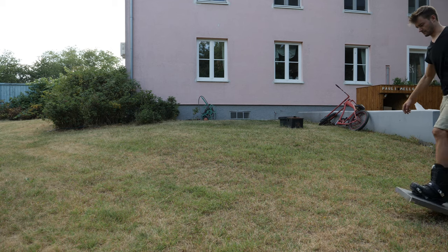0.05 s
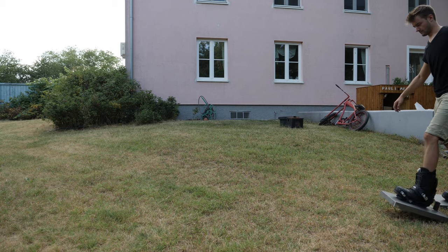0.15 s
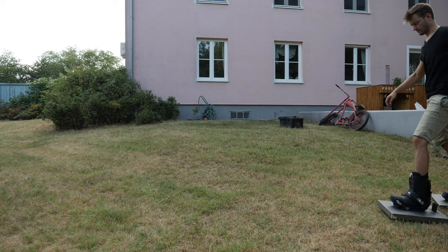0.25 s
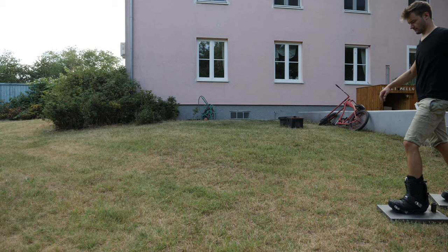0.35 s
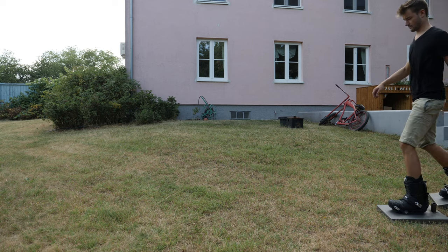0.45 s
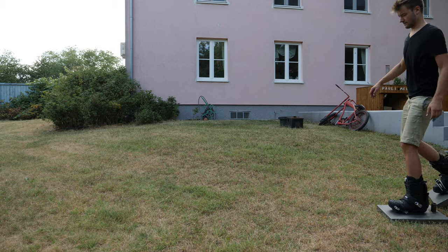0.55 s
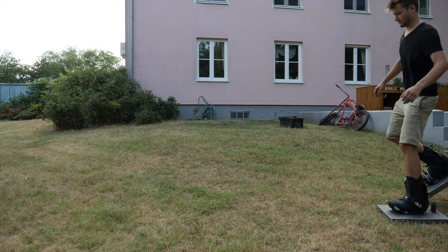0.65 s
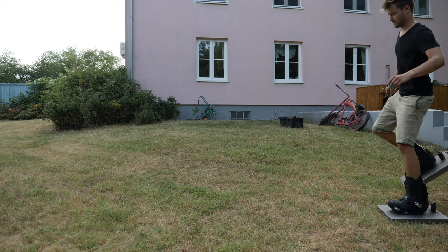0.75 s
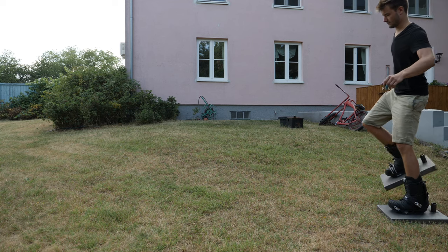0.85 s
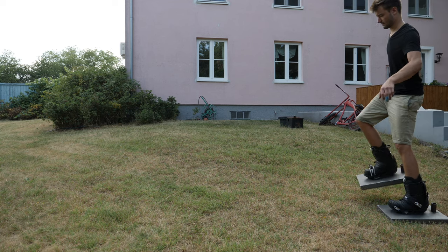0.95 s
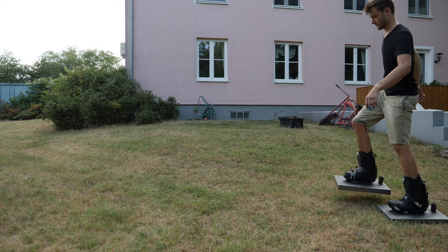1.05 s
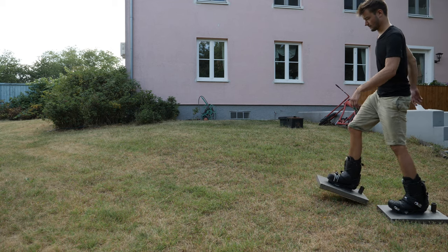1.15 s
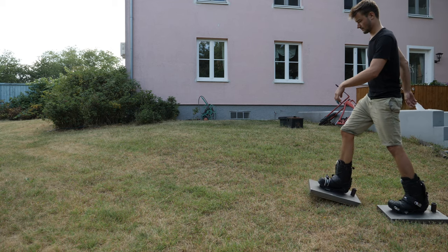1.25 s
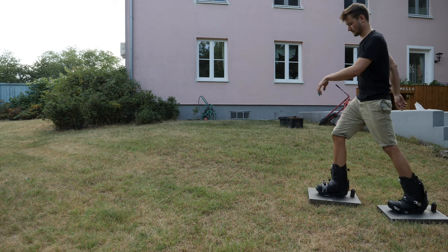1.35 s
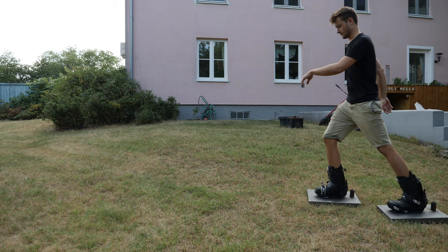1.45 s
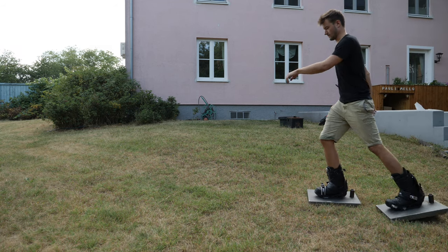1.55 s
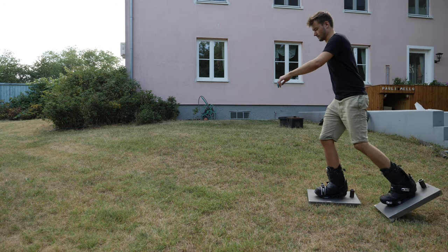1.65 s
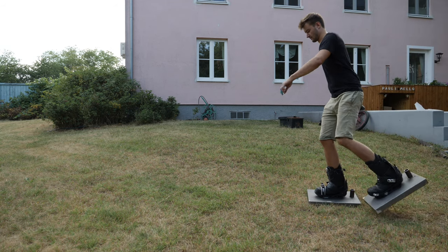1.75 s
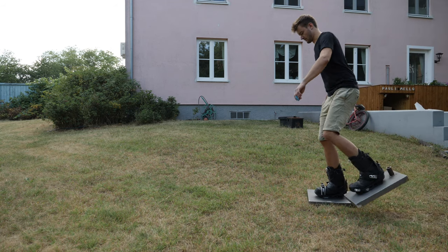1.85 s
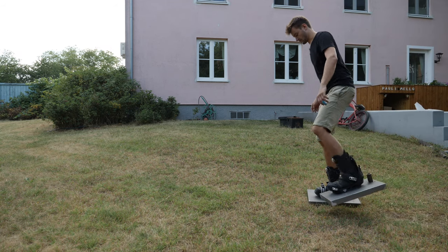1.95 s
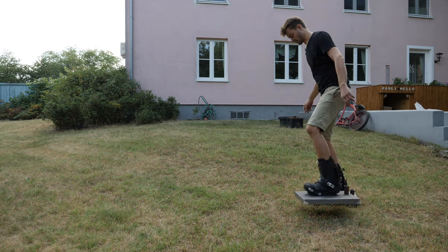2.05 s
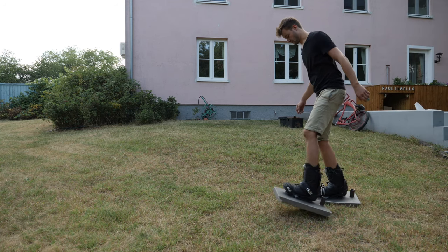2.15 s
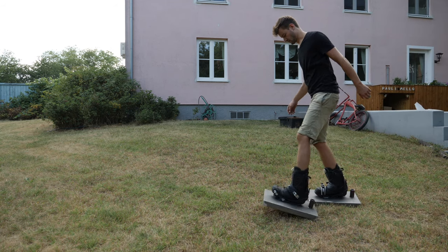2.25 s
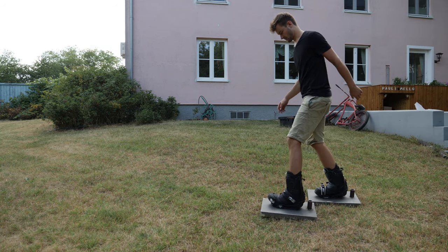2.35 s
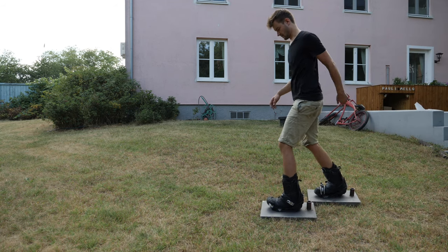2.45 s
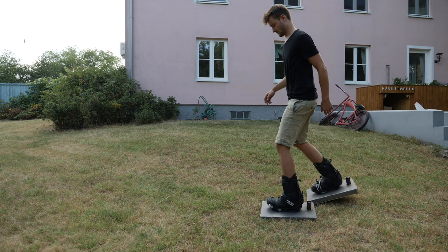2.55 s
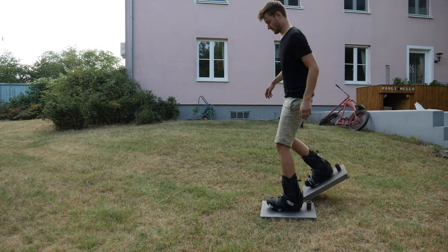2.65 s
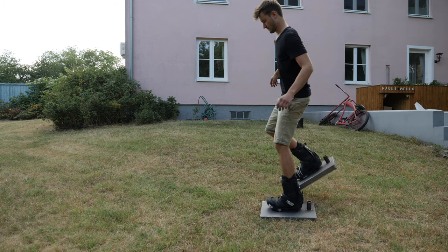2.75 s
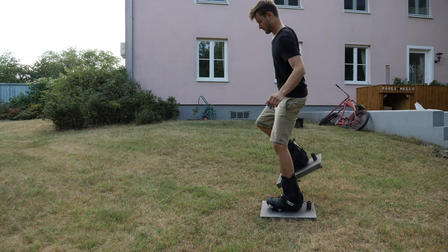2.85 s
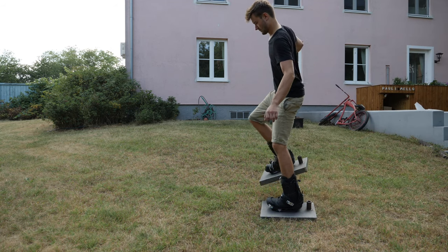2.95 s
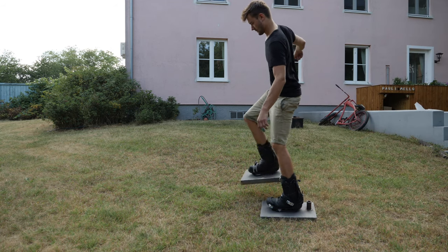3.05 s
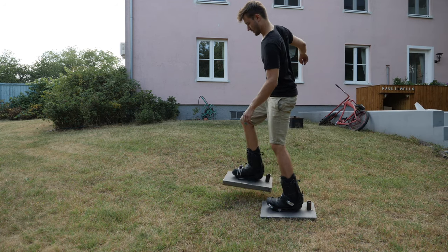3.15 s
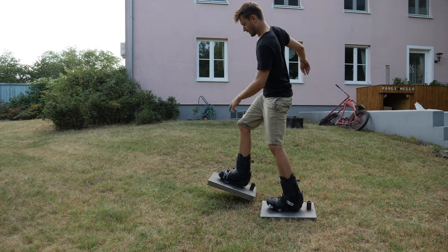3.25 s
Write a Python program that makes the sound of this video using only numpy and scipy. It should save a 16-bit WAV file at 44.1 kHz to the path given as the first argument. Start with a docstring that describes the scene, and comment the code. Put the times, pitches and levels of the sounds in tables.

```python
"""On a dry lawn, someone takes three slow steps in stiff plastic boots fixed to heavy plates.
Each plate swishes through the grass and lands with a clack. As the weight rolls over it, the
ground thuds, the grass crunches and the boot shell creaks and snaps; a lifted boot ticks.
Light wind rumbles on the microphone throughout."""
import sys
import numpy as np
from scipy import signal
from scipy.fft import rfft, irfft
from scipy.io import wavfile
from scipy.ndimage import uniform_filter1d

SR = 44100
rng = np.random.default_rng(int(sys.argv[2]) if len(sys.argv) > 2 else 0)


def dump(signal):
    """Clip the signal to [-1, 1] and save it as 16-bit WAV at the path in sys.argv[1]."""
    limited = np.clip(np.atleast_2d(signal).T, -1, 1)
    pcm = np.round(limited * 32767).astype(np.int16)
    wavfile.write(sys.argv[1], SR, pcm)


N = 145530
TIME = np.arange(N) / SR
RING_TIME = TIME[:SR // 4]

# Gusts of wind: t/s, level/dB
GUSTS = [(0.0, -40.5), (0.11, -46.5), (0.34, -36), (0.47, -43), (0.55, -37.5), (0.85, -30), (1.28, -40),
         (1.45, -29), (1.51, -35), (1.62, -18.5), (1.79, -34.5), (1.98, -30), (2.09, -24), (2.47, -32),
         (2.96, -26.5), (2.99, -22.5), (3.19, -47.5), (3.3, -36)]
# Snaps of the shell or a buckle: t/s, level/dB, ring f/Hz
SHELL_SNAPS = [(0.051, -54, 1360), (0.12, -54.5, 1320), (0.536, -41.5, 3100), (0.553, -41, 3000),
               (0.6197, -31.5, 1700), (0.625, -41, 1470), (0.85, -50.5, 2900), (1.3003, -30.5, 1080),
               (1.366, -42, 1530), (1.535, -37.5, 3250), (1.7141, -32.5, 2530), (1.924, -57, 3760),
               (1.935, -52, 1090), (2.005, -56, 3780), (2.128, -47.5, 1200), (2.1712, -49.5, 6230),
               (2.672, -37.5, 3950), (2.685, -30, 1580), (3.155, -42.5, 1640), (3.173, -44, 1510)]
# Grass brushing a plate: peak t/s, level/dB, 20 dB rise/s, 20 dB fall/s
GRASS_SWISHES = [(0.178, -48, 0.021, .05), (0.212, -41, .035, 0.076), (0.378, -46, 0.05, .04),
                 (0.416, -41.5, 0.023, 0.013), (0.48, -56.5, 0.04, 0.14), (1.295, -47, 0.059, 0.062),
                 (1.468, -44, .012, .04), (1.488, -43, .02, 0.036), (1.771, -54, 0.1, 0.088),
                 (2.307, -39.5, 0.055, .08), (2.448, -49, 0.028, 0.058), (2.505, -43, 0.076, 0.019),
                 (2.561, -45.5, .02, 0.054)]
# A plate knocking on its boot: t/s, level/dB, treble cutoff f/Hz, ring level/dB
PLATE_HITS = [(0.217, -25, 1170, -8), (0.2258, -17.5, 11000, -0.5), (1.2995, -26.5, 1580, -3),
              (2.3045, -21, 2380, -2), (2.3112, -21.5, 9000, -12), (2.3146, -21, 3180, 3)]
# The notes boot and plate ring with: f/Hz, level/dB, 60 dB fade/s
PLATE_NOTES = [(452, -12, 0.092), (584, -12.5, 0.075), (672.5, -12.5, 0.17), (814, -9.5, 0.2),
               (1140, -4, 0.05), (1275, -10, 0.13), (1545, -15.5, 0.18), (1773, -15.5, 0.17),
               (1963, -14, 0.1), (2110, -19, 0.2), (2420, -21.5, 0.13), (3522, -28.5, 0.11),
               (4230, -29, 0.085), (4255, -17, 0.13)]
# Grass crunching underfoot, one list a step: t/s, level/dB
STEP_CRUNCHES = [
    [(0.25, -70), (0.28, -43), (0.33, -51), (0.41, -45.5), (0.46, -47.5), (0.52, -53), (0.58, -57),
     (0.66, -56), (0.78, -62.5), (0.85, -56), (0.88, -80)],
    [(0.93, -77), (0.97, -56), (1.08, -73.5), (1.2, -61.5), (1.33, -44), (1.39, -54), (1.45, -51.5),
     (1.48, -46), (1.54, -47.5), (1.59, -54), (1.69, -55), (1.77, -51), (1.85, -69)],
    [(2.33, -74), (2.37, -45.5), (2.42, -50.5), (2.5, -44), (2.53, -48), (2.56, -44.5), (2.61, -52.5),
     (2.66, -53), (2.78, -64.5), (2.89, -58.5), (2.93, -60)],
]
# Weight meeting the ground: t/s, level/dB, f/Hz, width/s
GROUND_THUDS = [(0.4235, -27, 115, 0.0044), (0.428, -42, 206, 0.0091), (1.301, -36.5, 202, 0.0033),
                (1.321, -48.5, 184, 0.027), (1.501, -34, 102, 0.0023), (2.514, -45.5, 70, 0.018)]
# Creaks: ring f/Hz, unevenness/slip gaps, click level/dB, treble level/dB,
# and a list of (t/s, slip rate/Hz, level/dB)
SHELL_CREAKS = [ (3120, 0.13, -14, -10.5, [(0.436, 114, -38), (0.47, 138, -35.5), (0.49, 190, -39.5),
                (0.514, 88, -39.5)]), (2240, .05, 4.5, 2, [(0.596, 106, -42.5), (0.64, 129, -44.5),
                (0.69, 99, -44), (0.748, 254, -44), (0.772, 106, -44.5), (0.795, 48, -54)]),
                (2430, 0.07, -18, -4.5, [(0.819, 160, -44), (0.844, 200, -53)]),
                (8400, 0.14, -18, -4.5, [(0.946, 118, -45), (0.968, 166, -42.5), (0.996, 128, -43.5)]),
                (2070, .15, -5, 2.5, [(1.221, 120, -46), (1.255, 130, -40.5)]),
                (3270, 0.13, 7, -8, [(1.513, 167, -60), (1.545, 114, -38.5), (1.568, 70, -46)]),
                (1860, 0.14, -0.5, -22, [(1.685, 112, -62), (1.722, 134, -41.5), (1.77, 295, -39.5),
                (1.795, 380, -61)]), (3020, 0.1, 13.5, 4, [(2.526, 137, -41.5), (2.55, 140, -48),
                (2.59, 106, -48.5), (2.636, 105, -45.5)]), (1820, 0.037, 7, 2.5, [(2.695, 134, -41),
                (2.722, 198, -41.5), (2.78, 148, -41), (2.812, 125, -40.5), (2.835, 82, -43.5),
                (2.86, 138, -46), (2.878, 305, -46), (2.9, 416, -48.5), (2.915, 400, -68)]),
                (2910, 0.17, -1, -8, [(2.944, 296, -53), (2.962, 510, -58)])]
# Ticks of the lifted boot: t/s, level/dB
BOOT_TICKS = [(0.9282, -49), (0.937, -49), (1.0065, -45.5), (1.026, -46), (1.0348, -43), (1.0568, -47),
              (1.088, -47.5), (1.116, -48.5), (1.146, -48), (1.16, -50), (1.17, -44.5), (1.184, -56),
              (1.1922, -44.5), (1.204, -52), (1.211, -45.5), (2.1697, -44)]

# The tone of each sound, from bass to treble: f/Hz, level/dB
WIND_TONE = [(6, -18.5), (14, 3.5), (24, -4), (38, -20.5), (52, -24.5), (75, -40.5), (120, -60),
             (250, -55.5), (600, -85)]
AIR_TONE = [(30, 5.5), (80, 0.5), (170, 6), (400, -2.5), (1200, -6.5), (2500, -16), (6000, -18.5),
            (10000, -20.5), (16000, -29)]
SNAP_TONE = [(150, -14), (500, -3.5), (1500, 4), (3000, -3), (5000, -11), (9000, -15), (11000, -28),
             (16000, -44)]
SWISH_TONE = [(200, -1), (500, 2.5), (1200, -1.5), (2200, 0.5), (4200, 1), (7000, -1), (9200, 3.5),
              (10800, -12.5), (13000, -3), (16000, -16)]
CLACK_TONE = [(120, -28), (270, -7), (500, -5), (1300, -5.5), (2200, -8), (3200, -13), (5000, -13),
              (9000, -20.5), (11000, -36.5), (16000, -36)]
CRUNCH_TONE = [(100, -1.5), (220, -7), (420, 3.5), (750, -0.5), (1300, -4.5), (2000, -4), (3500, -13.5),
               (6000, -13.5), (9000, -17), (11000, -21.5), (16000, -22.5)]
SLIP_TONE = [(150, -3.5), (330, -8), (520, 1.5), (900, -1), (1300, -1), (2200, -3), (4500, -8.5),
             (7000, -7), (9400, -5.5), (10500, -18.5), (16000, -19)]
TICK_TONE = [(200, -23), (500, 12), (950, 1.5), (1500, -2), (2000, 11.5), (2600, 0.5), (4000, 3.5),
             (5000, -7.5), (6300, -4), (7200, -19), (8500, 6.5), (9700, -4), (11000, -10), (15000, -6)]

# How long each sound takes to die away: f/Hz, 60 dB fade/s
SNAP_FADE = [(300, 0.093), (1500, 0.018), (4000, 0.016), (10000, 0.023)]
CLACK_FADE = [(200, 0.13), (1000, 0.085), (3000, 0.1), (9000, 0.091)]
SLIP_FADE = [(400, 0.077), (1500, 0.0093), (4000, .014), (10000, 0.0064)]
TICK_FADE = [(400, 0.021), (2000, 0.012), (4000, 0.012), (10000, 0.0051)]

# Borders between bands of noise: f/Hz
BAND_EDGES = np.concatenate([100 * 2 ** (np.arange(16) / 3), np.arange(4000, 17000, 1000)])


def from_db(db):
    """Turn decibels into a gain."""
    return 10 ** (np.asarray(db) / 20)


def unit_power(x):
    """Scale a sound to an average power of 1."""
    return x / np.sqrt(np.mean(x ** 2) + 1e-20)


def at_hz(table, hz):
    """Look up a frequency in a table, on a log scale."""
    freqs, values = np.transpose(table)
    return np.interp(np.log(np.maximum(hz, 1)), np.log(freqs), values)


def with_tone(x, tone):
    """Shape the bass and treble of a steady sound; its power is 1."""
    gains = from_db(at_hz(tone, np.arange(N // 2 + 1) * SR / N))
    return unit_power(irfft(rfft(x) * gains, N))


def soften(x, hz, order=1):
    """Turn down the treble above hz."""
    return signal.sosfilt(signal.butter(order, hz, fs=SR, output="sos"), x)


def add(out, t, x):
    """Mix x in at t seconds."""
    i = int(np.clip(t * SR, 0, N - 1))
    out[i:i + len(x)] += x[:N - i]


def note(hz, fade_s):
    """One pure note dying away."""
    return np.sin(2 * np.pi * hz * RING_TIME) * from_db(-60 * RING_TIME / fade_s)


def burst(tone, fades):
    """A struck object rings like noise, each band dying at its own pace."""
    out, power = 0, 0
    for low, high in zip(BAND_EDGES, BAND_EDGES[1:]):
        hz = np.sqrt(low * high)
        fade = from_db(-60 * RING_TIME / at_hz(fades, hz))
        band_pass = signal.butter(2, [low, high], "band", fs=SR, output="sos")
        band = signal.sosfilt(band_pass, rng.standard_normal(len(fade)) * fade + 1e-18)
        gain = from_db(at_hz(tone, hz)) * np.sqrt(high - low)
        out += gain * unit_power(band) * np.sqrt(np.mean(fade ** 2))
        power += gain ** 2
    return out / np.sqrt(power)


def rustle(tone, grain_share, grains_per_s=5000, spread_db=5):
    """Dry grass blades make countless tiny ticks over a smooth hiss."""
    grains = (rng.random(N) < grains_per_s / SR) * rng.choice([-1, 1], N)
    grains = unit_power(grains * from_db(spread_db * np.minimum(rng.exponential(1, N), 5)))
    hiss = rng.standard_normal(N)
    return with_tone(np.sqrt(grain_share) * grains + np.sqrt(1 - grain_share) * hiss, tone)


def wind():
    """Gusts push on the microphone and rumble over a faint hush of air."""
    rumble = with_tone(rng.standard_normal(N), WIND_TONE)
    # Even it out, so the gusts set the loudness.
    rumble /= np.sqrt(uniform_filter1d(rumble ** 2, size=6000) + 1e-6)
    gust_db = np.interp(TIME, *np.transpose(GUSTS))
    air = with_tone(rng.standard_normal(N), AIR_TONE)
    return from_db(gust_db + 0.5) * rumble + from_db(-65) * air


def snaps():
    """The shell or a buckle clicks, each time with its own short ring."""
    out = np.zeros(N)
    for t, db, hz in SHELL_SNAPS:
        click = from_db(-2.5) * burst(SNAP_TONE, SNAP_FADE)
        ring = from_db(3) * note(hz, fade_s=0.0067)
        add(out, t, from_db(db) * (click + ring))
    return out


def swishes(swell=1.17):
    """Grass brushes a moving plate; a swell above 1 steepens the start and rounds the top."""
    power = np.zeros(N)
    for t, db, rise, fall in GRASS_SWISHES:
        before = (np.maximum(t - TIME, 0) / rise) ** swell
        after = (TIME - t) / fall
        power += from_db(db - 20 * np.maximum(before, after)) ** 2
    return np.sqrt(power) * rustle(SWISH_TONE, grain_share=0.68)


def clacks(crack_fade_s=0.0074):
    """A landing plate cracks, rings and rattles against its boot; soft landings are duller."""
    out = np.zeros(N)
    for t, db, cutoff_hz, ring_db in PLATE_HITS:
        ring = sum(from_db(level + rng.normal(0, 0.5)) * rng.choice([-1, 1]) * note(hz, fade_s)
                   for hz, level, fade_s in PLATE_NOTES)
        ring *= from_db(ring_db - 0.5)
        crack = from_db(2.5) * burst(CLACK_TONE, [(cutoff_hz, crack_fade_s)])
        rattle = from_db(-4) * burst(CLACK_TONE, CLACK_FADE)
        add(out, t, from_db(db) * soften(crack + ring + rattle, cutoff_hz))
    return out


def crunches():
    """Grass is crushed under each step, darker in tone than the swish."""
    load = sum(from_db(np.interp(TIME, *np.transpose(step), left=-np.inf, right=-np.inf))
               for step in STEP_CRUNCHES)
    return load * rustle(CRUNCH_TONE, grain_share=0.48)


def thuds():
    """Weight pushes on the ground in short, low pulses."""
    out = np.zeros(N)
    for t, db, hz, width in GROUND_THUDS:
        pulse = np.exp(-0.5 * ((TIME - t) / width) ** 2)
        out -= from_db(db) * np.cos(2 * np.pi * hz * (TIME - t)) * pulse
    return out


def creaks(alike=0.65, treble_hz=4000, scatter_db=0.94):
    """The bending shell sticks and slips; each slip is a click and a slightly different ring."""
    out = np.zeros(N)
    click = soften(signal.unit_impulse(len(RING_TIME)) + 1e-18, hz=4000, order=2)
    variants = [burst(SLIP_TONE, SLIP_FADE) for _ in range(16)]
    for hz, uneven, click_db, treble_db, course in SHELL_CREAKS:
        shared = burst(SLIP_TONE, SLIP_FADE)
        times, rates, levels = np.transpose(course)
        slip_count = np.cumsum(np.interp(TIME, times, rates, left=0, right=0)) / SR
        slip_times = TIME[1:][np.diff(np.ceil(slip_count)) > 0]
        for t in slip_times:
            variant = variants[rng.integers(len(variants))]
            body = from_db(-4) * (np.sqrt(alike) * shared + np.sqrt(1 - alike) * variant)
            body += from_db(6.5) * signal.lfilter(*signal.iirpeak(hz, Q=4.4, fs=SR), body)
            db = np.interp(t, times, levels)
            low = soften(body, treble_hz)
            # A weaker slip has less treble.
            treble = from_db(treble_db + 0.36 * (db - levels.max())) * (body - low)
            slip = low + treble + from_db(click_db + 12) * click
            delay = rng.normal(0, uneven) / np.interp(t, times, rates)
            add(out, t + delay, from_db(db + rng.normal(0, scatter_db)) * slip)
    return out


def ticks():
    """The shell gives in single bright ticks while the boot hangs from the leg."""
    out = np.zeros(N)
    for t, db in BOOT_TICKS:
        add(out, t, from_db(db + 2.5) * burst(TICK_TONE, TICK_FADE))
    return out


def scene():
    """Wind, boots and grass mixed into one channel."""
    return (wind() + snaps() + swishes() + clacks() + crunches() + thuds() + creaks() + ticks())[None]


def record(dry, cutoff_hz=15900):
    """Cut off the very highest treble."""
    return signal.sosfilt(signal.ellip(10, 0.2, 70, cutoff_hz, fs=SR, output="sos"), dry)


dry = scene()
out = record(dry)
dump(out)
```